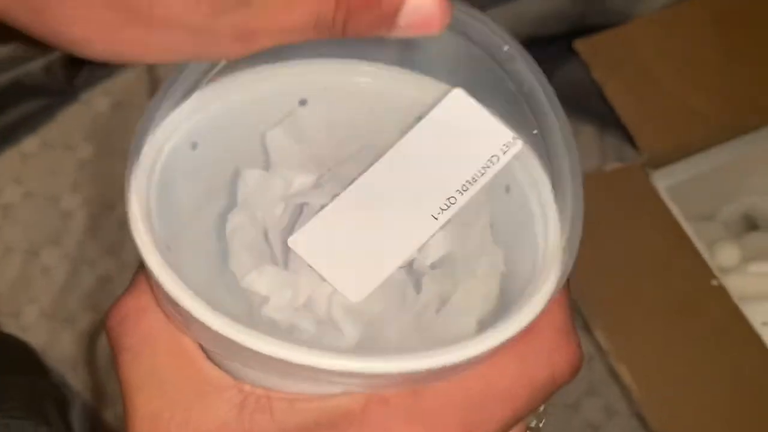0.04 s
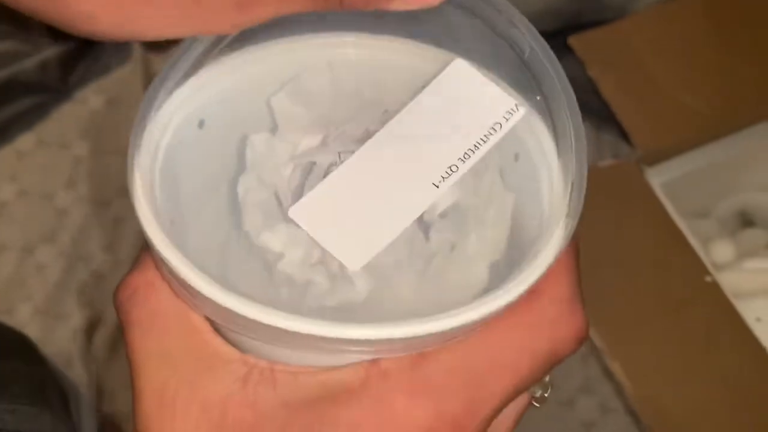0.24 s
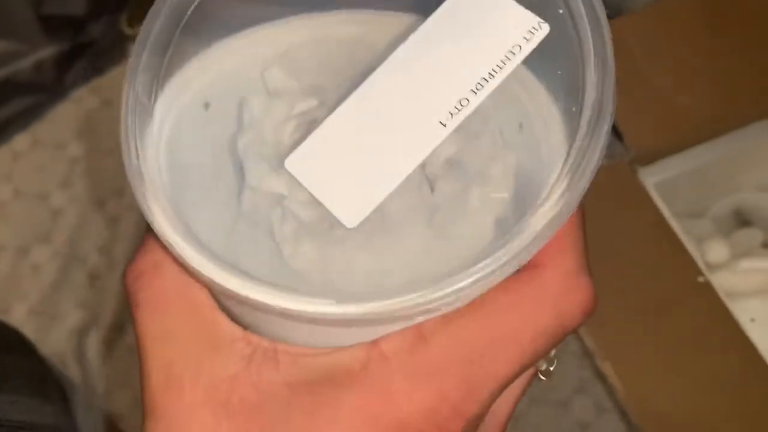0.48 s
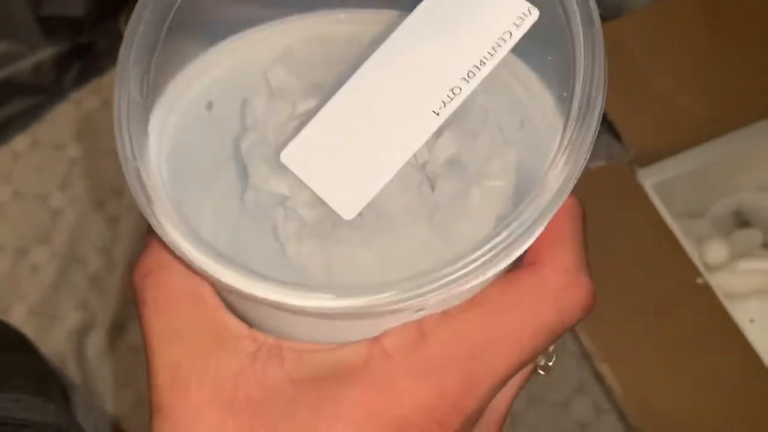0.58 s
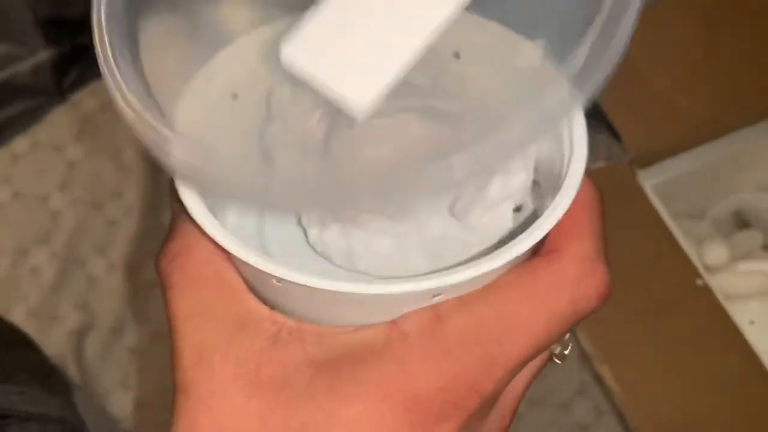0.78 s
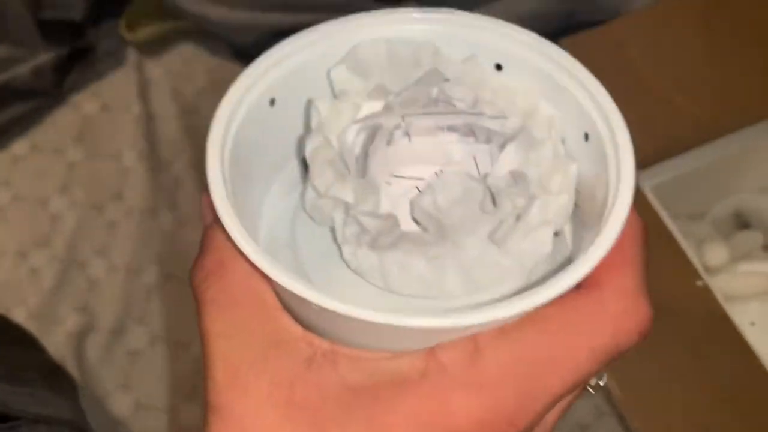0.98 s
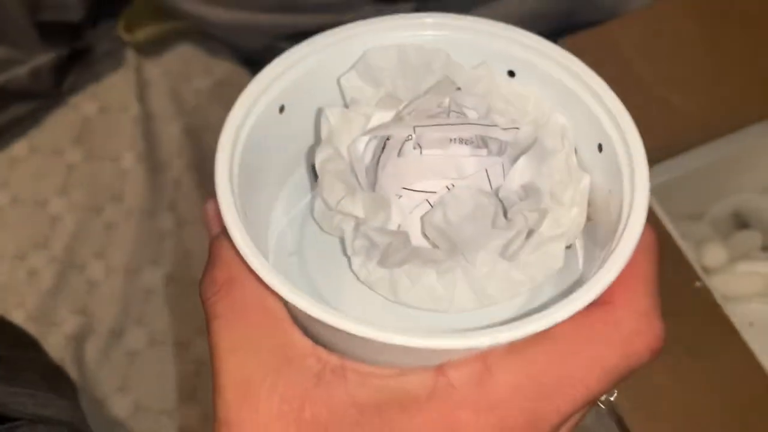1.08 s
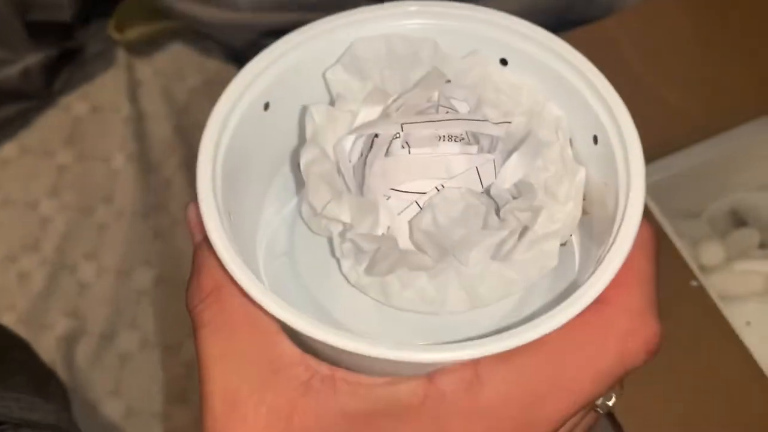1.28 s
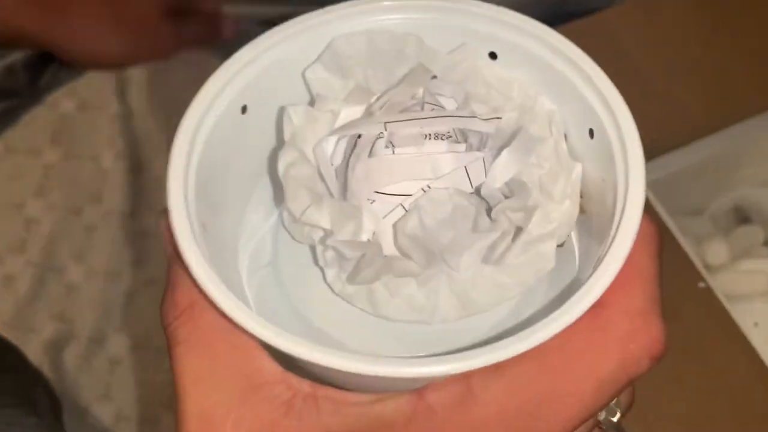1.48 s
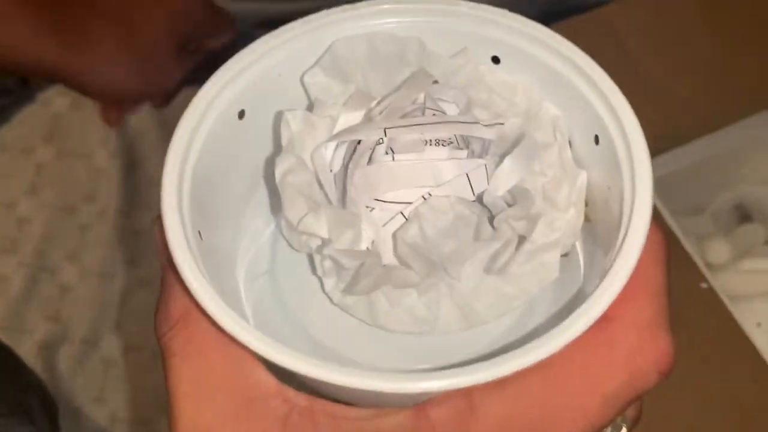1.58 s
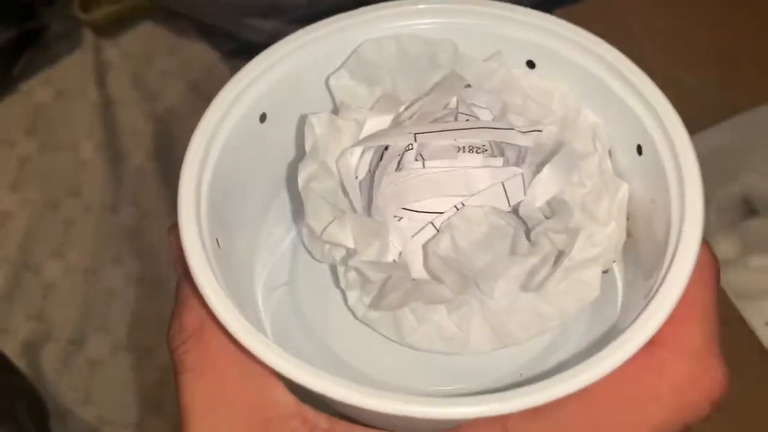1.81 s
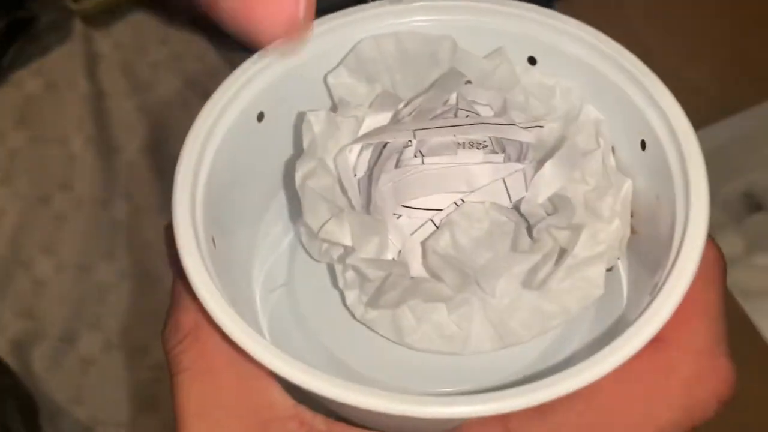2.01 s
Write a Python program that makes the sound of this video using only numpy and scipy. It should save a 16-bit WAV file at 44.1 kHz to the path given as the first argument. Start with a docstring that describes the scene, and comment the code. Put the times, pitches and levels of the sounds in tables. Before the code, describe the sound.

A thin plastic lid creaks faintly, then pops off a plastic tub in a rapid cluster of sharp hollow snaps; sparse tiny ticks and soft rustling follow, close to a phone in a quiet, faintly humming room.

```python
"""A thin plastic lid is pried off a cup close to a phone, with mains hum and room air noise throughout.
First the bent plastic creaks in short tones; then the rim creeps and lets go in a quick run of snaps,
each a burst of noise plus ringing tones for the lid and a low thump for the cup.
A few small ticks, made like the snaps, follow with faint creaks and a soft rub of cloth and paper,
made of coloured noise. A short echo of the room follows the lid sounds."""
import sys
import numpy as np
from scipy import signal
from scipy.fft import rfft, irfft
from scipy.io import wavfile
from scipy.ndimage import uniform_filter1d

SR = 44100
rng = np.random.default_rng(int(sys.argv[2]) if len(sys.argv) > 2 else 0)


def wav_record(signal):
    """Record a signal, one row per channel, as 16-bit PCM in the file named by sys.argv[1]."""
    frames = np.transpose(np.atleast_2d(signal))
    bounded = np.clip(frames, -1, 1)
    # unit amplitude maps onto the largest positive 16-bit level
    quanta = np.round(bounded * 32767).astype(np.int16)
    wavfile.write(sys.argv[1], SR, quanta)


N = 90404  # length in samples


def undb(db):
    """Turn decibels into a plain multiplier."""
    return 10 ** (np.asarray(db) / 20)


def curve(rows):
    """Multiplier over time, drawn through rows of seconds and dB."""
    seconds, db = np.array(rows).T
    return undb(np.interp(np.arange(N) / SR, seconds, db))


def over_hz(rows):
    """Value at every frequency, drawn through rows of Hz and value on a logarithmic pitch scale."""
    hz, value = np.array(rows, float).T
    every_hz = np.fft.rfftfreq(N, 1 / SR)
    return np.interp(np.log(every_hz + 1), np.log(hz + 1), value)


def unit(x):
    """Scale a sound to an average (RMS) level of 1."""
    return x / np.sqrt(np.mean(x ** 2))


def walk(rate):
    """Random wandering: about `rate` new values a second, each held and then smoothed twice."""
    hold = int(SR / rate)
    steps = np.repeat(rng.standard_normal(N // hold + 1), hold)
    return uniform_filter1d(uniform_filter1d(steps, hold), hold)[:N]


def coloured(rows, flicker_db, rate):
    """Two unrelated noises of one colour; each half-octave band flickers on its own."""
    hz = np.fft.rfftfreq(N, 1 / SR) + 1
    spectrum = rfft(rng.standard_normal((2, N))) * undb(over_hz(rows))
    out = 0
    for octave in np.arange(4, 14.5, .5):  # band centres at 2 ** octave Hz
        band = np.clip(1 - 2 * abs(np.log2(hz) - octave), 0, 1)
        out = out + irfft(spectrum * band, N) * undb(flicker_db * walk(rate))
    return unit(out)


def modes(table):
    """A struck object: fading sine tones from rows of Hz, dB and seconds to fade by 60 dB."""
    t = np.arange(SR // 4) / SR
    return sum(undb(db) * np.sin(2 * np.pi * hz * t) * np.exp(-np.log(1000) * t / t60)
               for hz, db, t60 in table)


def push(seconds):
    """A smooth push with a total of 1; a longer push excites less treble."""
    shape = np.hanning(int(seconds * SR) + 3)
    return shape / shape.sum()


def snaps():
    """Each snap or tick: a burst of grit, a short push that rings the lid, a soft late one into the cup."""
    # Rim snaps and ticks. Each row: start in seconds, crack level in dB, crack time scale in ms,
    # lid ring level in dB, lid boom level in dB, boom pitch in Hz, cup thump level in dB.
    snap_rows = [(.1000, -62, 0.89, -51.5, -70, 185, -72), (.1943, -35, 0.88, -40.5, -29.5, 202, -57),
                 (0.207, -33.5, 3, -32.5, -42, 190, -58), (0.2122, -49, 1, -32.5, -20, 141, -45),
                 (0.2171, -39.5, 0.92, -26, -62, 185, -32), (0.2239, -16.5, 0.63, -18.5, -10.5, 196.4, -39),
                 (0.2296, -22, 0.56, -26, -17, 176, -15), (.2580, -36.5, 0.98, -45.5, -32, 187, -78),
                 (0.323, -54, 0.58, -69, -64, 182, -66), (.5720, -63, 7.2, -62, -48, 183, -64),
                 (0.606, -47.5, 2.3, -43.5, -53, 199, -57), (0.6103, -48, 2.7, -46, -36.5, 110, -43),
                 (.6210, -54, 1.6, -57.5, -47, 183, -50), (0.662, -61.5, 0.5, -63, -66, 185, -73),
                 (1.0530, -43.5, 0.36, -72, -57, 185, -64.5), (1.058, -49, 0.64, -53, -65, 185, -67),
                 (1.6450, -53, 2.1, -49, -59, 208, -65), (1.6520, -62, 1.6, -58, -43, 164, -48),
                 (1.6745, -48.5, 1.94, -46, -47.5, 207, -57)]
    # Colour of the crack. Each row: frequency in Hz, relative level in dB.
    crack_colour = [(800, -26.5), (2200, 2.5), (3000, -14), (3800, -9.5), (6000, -12.5), (7500, -9),
                    (8600, 0.5), (9600, -5.5), (11500, -18.5), (13500, -9), (15500, -18.5), (20000, -14)]
    # Ringing tones of the lid. Each row: pitch in Hz, relative level in dB, 60 dB fade in seconds.
    ring_modes = [(278, 0, 0.046), (406, -6.5, 0.038), (602, -3.5, 0.041), (711, 0.5, 0.03),
                  (906, -4, 0.03), (1004, 1, 0.019), (1270, -3, 0.01)]
    # Low tone of the cup. Each row: pitch in Hz, relative level in dB, 60 dB fade in seconds.
    thump_modes = [(68, 0, 0.13)]
    ring_push_s, boom_push_s, thump_push_s = 0.00076, 0.0019, 0.0095
    boom_t60_s, thump_lag_s = 0.047, 0.0012

    # every other tone starts in the opposite direction
    ring = modes(ring_modes[1::2]) - modes(ring_modes[::2])
    ring = np.convolve(ring, push(ring_push_s))
    thump = np.convolve(modes(thump_modes), push(thump_push_s))
    thump = np.pad(thump, (int(thump_lag_s * SR), 0))
    grit = coloured(crack_colour, 0, 10)
    t = np.arange(1500) / SR
    out = np.zeros((2, N + SR))
    for start_s, crack_db, crack_ms, ring_db, boom_db, boom_hz, thump_db in snap_rows:
        i = int(start_s * SR)
        u = t * 1000 / crack_ms
        crack = grit[:, i:i + len(t)] * u * np.exp(1 - u ** 1.37)  # quick rise, then fade
        boom = -np.convolve(modes([(boom_hz, boom_db, boom_t60_s)]), push(boom_push_s))
        for part, db in ((crack, crack_db), (ring, ring_db), (boom, 0), (thump, thump_db)):
            out[:, i:i + part.shape[-1]] += part * undb(db)
    return out[:, :N]


def creaks():
    """Bent plastic creaks: short sine notes with soft edges and a slightly rough level."""
    # Creaking notes. Each row: centre in seconds, pitch in Hz, length in seconds, level in dB.
    creak_rows = [(.010, 640, .02, -51), (0.047, 380, 0.021, -52), (0.044, 1390, .03, -58),
                  (0.072, 1370, 0.02, -52.5), (0.101, 460, 0.037, -49.5), (.102, 2020, 0.013, -60),
                  (0.208, 1030, 0.0045, -28), (0.222, 2130, .012, -27), (0.447, 390, 0.058, -56.5),
                  (0.473, 295, 0.064, -57), (1.061, 3400, 0.0063, -57), (1.726, 230, 0.031, -54)]
    t = np.arange(N) / SR
    notes = np.zeros(N)
    for centre_s, hz, length_s, db in creak_rows:
        swell = np.exp(-(2 * (t - centre_s) / length_s) ** 2)
        phase = rng.uniform(0, 2 * np.pi)
        notes += undb(db) * swell * np.sin(2 * np.pi * hz * t + phase)
    return notes * undb(2.0 * walk(160))


def creep():
    """The rim creeping between the snaps: flickering noise that rises and falls with the run."""
    # Loudness of the creeping. Each row: time in seconds, level in dB.
    creep_level = [(.17, -82), (.19, -53.5), (.196, -39), (.205, -43.5), (.211, -47), (.22, -37),
                   (.232, -26.5), (.245, -57), (.27, -50.5), (.32, -62), (.35, -88)]
    # Its colour. Each row: frequency in Hz, relative level in dB.
    creep_colour = [(300, 6), (1000, 5), (2000, 1), (4000, -9), (8600, -7), (11000, -12.5), (13500, -10),
                    (16500, -21)]
    return coloured(creep_colour, 1.9, 370) * curve(creep_level)


def rub():
    """Cloth and paper rubbing: bright noise made grainy by fast changes in level."""
    # Loudness of the rubbing. Each row: time in seconds, level in dB.
    rub_level = [(0, -52.5), (.04, -72), (.1, -91), (.18, -72), (.38, -81.5), (.44, -78), (.52, -78.5),
                 (.7, -86), (.79, -88), (.83, -64), (.94, -67), (.97, -71.5), (1.05, -63.5), (1.14, -70),
                 (1.2, -90), (1.3, -74.5), (1.42, -85), (1.62, -81), (1.65, -72), (1.7, -69), (1.76, -84),
                 (2.05, -87)]
    # Its colour. Each row: frequency in Hz, relative level in dB.
    rub_colour = [(1500, -17.5), (3000, -4), (5500, 0.5), (6800, 0), (7800, -6), (9000, -0.5), (11500, -6),
                  (13300, -2), (15000, -11), (16500, -13)]
    grain = undb(1.5 * walk(400))
    return coloured(rub_colour, 1.4, 45) * grain * curve(rub_level)


def tail(x):
    """Short echo of the room: fading noise stands in for many reflections, different at each port."""
    tail_db, tail_t60_s, rise_s = -14, 0.15, 0.0027
    t = np.arange(SR // 2) / SR
    fade = np.exp(-np.log(1000) * t / tail_t60_s)
    echo = rng.standard_normal((2, len(t))) * fade * np.minimum(t / rise_s, 1)
    echo = echo / np.sqrt(np.sum(echo[0] ** 2))
    return signal.fftconvolve(x[None], echo, axes=1)[:, :N] * undb(tail_db)


def air():
    """Air noise of the quiet room: mostly low noise whose bands drift slowly."""
    # Colour of the room air. Each row: frequency in Hz, relative level in dB.
    air_colour = [(15, -69), (30, -48), (45, -9.5), (70, -11), (90, -10.5), (150, -15), (270, -19),
                  (370, -16), (700, -21.5), (1300, -22), (2200, -28.5), (4500, -41.5), (7000, -50),
                  (12000, -54.5), (16500, -60)]
    # Its loudness. Each row: time in seconds, level in dB.
    air_level = [(0, -47), (.06, -52.5), (.12, -53), (.17, -55.5), (.35, -55), (.45, -56), (.55, -56.5),
                 (1.0, -57), (1.5, -55.5), (1.7, -55.5), (1.8, -56.5), (2.05, -57.5)]
    return coloured(air_colour, 1.2, 11.84) * curve(air_level)


def hum():
    """Mains hum: steady low tones near multiples of 60 Hz, each wandering a little in level."""
    # Hum tones. Each row: pitch in Hz, level in dB before the lift and level curve below.
    hum_tones = [(60, -58.5), (120, -53.5), (180, -71.5), (358, -69.5)]
    # Rise and fall of the whole hum. Each row: time in seconds, gain in dB.
    hum_level = [(0, -1.5), (.1, -3.5), (.3, -11.5), (.45, -4), (.7, -1.5), (1.0, -2), (1.45, -0.5),
                 (1.6, -6.5), (1.75, -3), (2.05, -6)]
    lift_db = 3
    t = np.arange(N) / SR
    tone = np.zeros(N)
    for hz, db in hum_tones:
        level = undb(db + lift_db + 0.9 * walk(2.6))
        tone += level * np.sin(2 * np.pi * hz * t + rng.uniform(0, 4.7))
    return np.array([tone, tone]) * curve(hum_level)


def ports(pair, balance, likeness):
    """Two microphone ports: the right hears the left phase-shifted, mixed with a second signal."""
    # Phase of right against left. Each row: frequency in Hz, phase in radians.
    port_phase = [(0, -.3), (400, -.4), (1100, -.6), (1700, -2.9), (2400, -3.3), (5200, -8.3), (6400, -6.1),
                  (7900, -3.25), (9000, -3.05), (10500, -.1), (11500, .1), (13000, 3.05), (14200, 3.25),
                  (15000, 6.2), (22050, 6.3)]
    first, second = rfft(pair)
    share = np.clip(likeness, 0, 1)  # 1 means both ports hear the same signal
    tilt = undb(over_hz(balance) / 2)  # half the difference goes to each side
    hz, radians = np.array(port_phase).T
    turn = np.exp(1j * np.interp(np.fft.rfftfreq(N, 1 / SR), hz, radians))
    left = first * tilt
    right = (share * first + np.sqrt(1 - share ** 2) * second) * turn / tilt
    return irfft(np.array([left, right]), N)


def scene():
    """Add the nearby lid, the diffuse sounds and the hum as heard at the two ports."""
    # Likeness of diffuse sound at the two ports. Each row: frequency in Hz, likeness from 0 to 1.
    port_likeness = [(60, 1), (150, 0.9), (300, 0.37), (1000, 0.15), (2000, 0.1), (5000, .15), (7000, 0.2),
                     (7900, 0.98), (16000, 0.93)]
    # Left minus right for the lid. Each row: frequency in Hz, difference in dB.
    lid_balance = [(60, 1), (110, 6), (200, 6), (380, 7), (700, 9.5), (1290, 6), (2380, 1), (4400, -8),
                   (8120, -1), (15000, 0.0)]
    # Left minus right for all other sounds. Each row: frequency in Hz, difference in dB.
    air_balance = [(60, -5), (110, 0), (200, -2.5), (380, 2.5), (700, 4.5), (1290, 1), (2380, 0.5),
                   (4400, 1.5), (8120, -2.5), (15000, 0.5)]
    diffuse = over_hz(port_likeness)
    near = np.maximum(diffuse, .8)
    lid = snaps() + creaks()
    close_sound = ports(lid + creep(), lid_balance, near)
    room_sound = ports(tail(lid[0]) + rub() + air(), air_balance, diffuse)
    return close_sound + room_sound + ports(hum(), air_balance, 1)


def record(dry):
    """The phone trims the deep bass below 40 Hz and cuts the top steeply above 16100 Hz."""
    bass_trim = signal.butter(3, 40, "high", fs=SR, output="sos")
    top_cut = signal.ellip(10, .2, 60, 16100, fs=SR, output="sos")
    return signal.sosfilt(top_cut, signal.sosfilt(bass_trim, dry))


dry = scene()
out = record(dry)
wav_record(out)
```